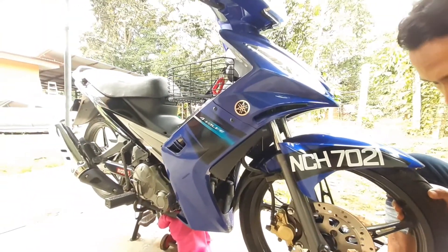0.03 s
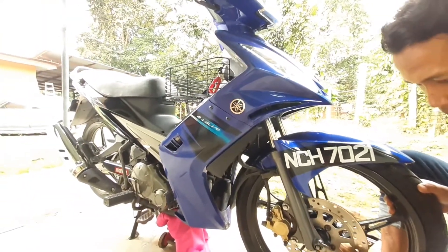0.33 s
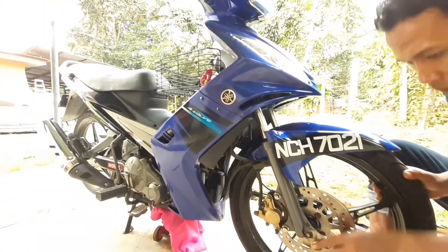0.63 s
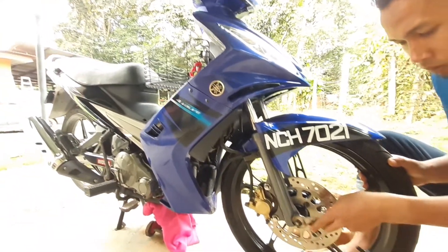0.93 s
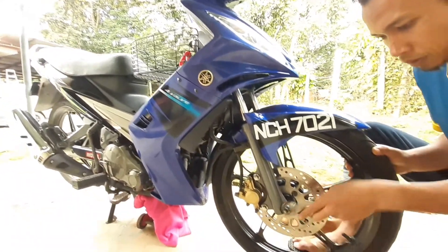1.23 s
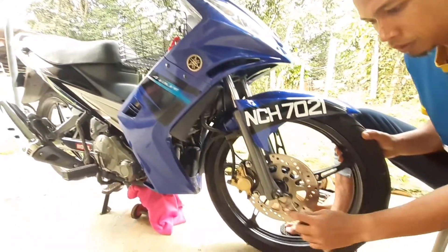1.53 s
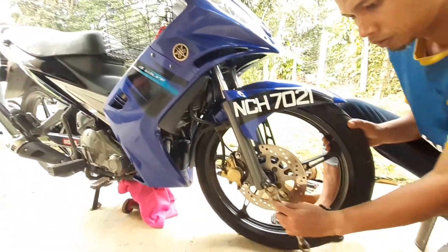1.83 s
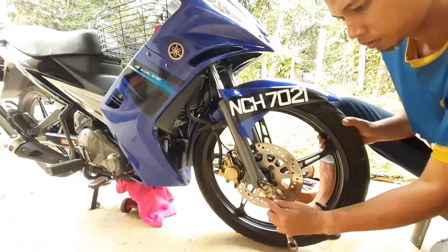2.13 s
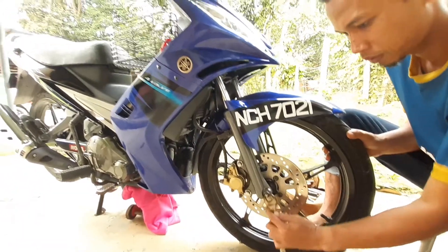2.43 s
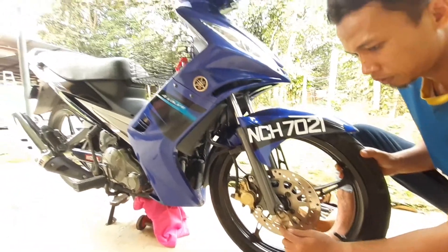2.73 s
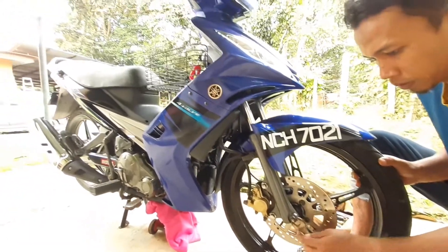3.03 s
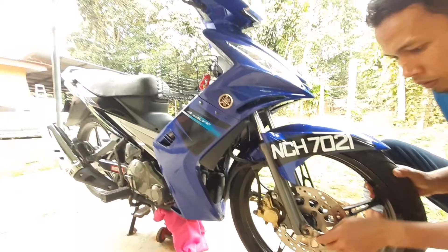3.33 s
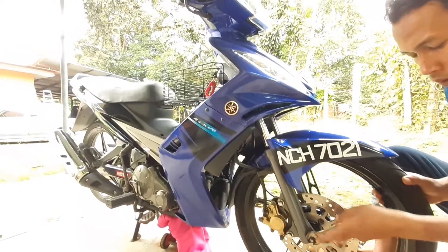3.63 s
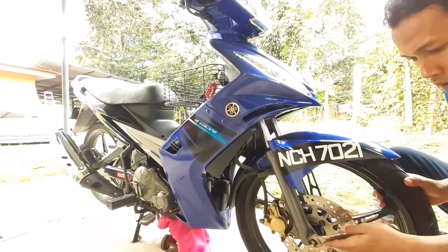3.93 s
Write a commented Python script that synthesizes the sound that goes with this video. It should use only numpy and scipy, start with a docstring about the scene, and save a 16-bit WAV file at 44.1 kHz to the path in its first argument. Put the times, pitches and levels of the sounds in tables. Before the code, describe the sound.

A motorcycle's front wheel gives scattered metallic knocks and brief scrapes as it is worked by hand, close to the microphone under a porch. Farther off, an engine pulls steadily, then eases and burbles with a few pops.

```python
"""A motorcycle's front wheel, worked by hand under a porch, close to a stereo pair of microphones.
Knocks and scuffs set wheel, brake disc and fork ringing; a hand brushes tyre and disc.
Some way off, the firings of a single-cylinder engine thud and rasp through its exhaust:
it pulls steadily, then comes off the throttle and burbles on with a few pops.
A low outdoor rumble and a thin hiss lie underneath."""
import sys
import numpy as np
from scipy import signal
from scipy.fft import rfft, irfft
from scipy.io import wavfile

SR = 44100
rng = np.random.default_rng(int(sys.argv[2]) if len(sys.argv) > 2 else 0)


def transcribe(signal):
    """Save signal, clipped to [-1, 1], as a 16-bit WAV file at the path in sys.argv[1]."""
    frames = np.atleast_2d(signal).T
    limited = np.clip(frames, -1, 1)
    pcm = np.round(limited * 32767).astype(np.int16)
    wavfile.write(sys.argv[1], SR, pcm)


N = 176400
T = np.arange(N) / SR

# Blows between the parts. Each row: start in seconds, gain in dB, brightness in Hz,
# weights of fork, disc and crack in dB, low cut in Hz.
KNOCK_BLOWS = [(.0125, -21, 2940, -12, -8, 3.5, 1350), (.0665, -21.5, 1250, -5.5, 2, -1, 260),
               (0.4792, -16, 1300, 1, 6.5, 5.5, 300), (1.111, -21, 1090, -1, -10, 7.5, 260),
               (1.184, -27, 1720, -1.5, 0, 9, 300), (1.210, -30, 4000, 13, 1.5, 5, 600),
               (1.822, -18.5, 2650, 3, 0, -3, 440), (1.940, -28.5, 1600, -8, 9, -6, 350),
               (1.9715, -19.5, 970, -4.5, -8, -4, 356), (2.359, -44.5, 3570, -12, 4.5, 18, 500),
               (3.164, -12, 4400, 6.5, -3, -3, 292), (3.8665, -16.5, 1460, -1.5, -9, -9, 300)]
# Parts sliding. Each row: start and length in seconds, level in dB, brightness in Hz,
# weight of the disc in dB, grit level in dB.
SCUFF_SLIDES = [(0.34, .07, -44, 1420, 6, -67), (0.455, 0.013, -32, 1900, 2, -67),
                (0.581, .02, -43, 1740, 5, -69), (1.172, 0.069, -48.5, 2040, 10, -52.5),
                (1.882, .02, -32, 1700, 2, -57), (1.922, 0.035, -31.5, 1350, -8, -58),
                (1.987, 0.019, -41, 900, 5, -75), (3.082, 0.04, -41.5, 1400, 5, -56.5),
                (3.118, .044, -36, 1030, 15.5, -53)]
# A hand on tyre and disc. Each row: start and length in seconds, gain in dB, centre in Hz.
HAND_STROKES = [(0.095, 0.17, -62, 4400), (0.997, 0.13, -55.5, 6060)]
# How each part rings. Each row: pitch in Hz, gain in dB, seconds to fall by 60 dB.
FORK_RINGING = [(308.8, -19.5, 0.24), (531.7, -14.5, 0.12)]
WHEEL_RINGING = [(676, -14, 0.15), (729, -1.5, 0.071), (817, -12.5, 0.086), (894, -8, 0.03),
                 (1012, -7.5, 0.15), (1169, -7.5, 0.046), (1290, -18.5, 0.066), (1467, -18, 0.043),
                 (1700, -10, 0.02), (1875, -16.5, 0.041), (2018, -15.5, 0.05), (2256, -17, 0.043),
                 (3790, -22, 0.033), (4000, -14, 0.013)]
DISC_RINGING = [(2733, -10, 0.048), (2780, -10, 0.02), (3180, -16, .03), (6195, -2.5, 0.022)]
# Reflections off slab and bodywork. Each row: delay in seconds, gain in dB.
CLOSE_ECHOES = [(.0043, -7.5), (.0105, -5)]
# Engine speed. Each row: time in seconds, firings per second.
FIRING_RATE = [(0, 31.69), (.165, 32.05), (.46, 32.7), (.76, 33.3), (1.06, 33.9), (1.4, 34.3), (2.5, 35.46),
               (4, 34.45)]
# The engine from a distance. Each row: time in seconds, then exhaust thud, silencer boom and rasp in dB.
ENGINE_LEVELS = [(0, -34, -66, -36), (.15, -33.5, -46, -43), (.7, -33.5, -58.5, -42.5),
                 (.88, -31, -40, -41), (.96, -33.5, -32.5, -42), (1.32, -37.5, -31.5, -42),
                 (1.41, -33.5, -36, -44.5), (1.53, -39.5, -51, -52.5), (1.7, -50, -76, -60),
                 (2.5, -49.5, -53, -91), (3.05, -48, -39, -57.5), (3.55, -60.5, -66, -59.5),
                 (4, -58, -49, -112)]
# Pops off the throttle. Each row: start in seconds, peak in dB.
EXHAUST_POPS = [(1.587, -40), (1.617, -31.5), (1.739, -28), (1.99, -31), (2.122, -29.5), (2.888, -37),
                (3, -33), (3.764, -37)]
# Resonances of the rasp. Each row: centre in Hz, width in Hz, gain in dB.
RASP_BANDS = [(414, 25, 3.5), (706, 109, -3), (860, 51, 6), (1110, 57, -5.5), (1308, 38, -1),
              (2410, 420, -15.5), (3970, 800, -18.5), (8300, 13000, -28)]
# The outdoor background. Each row: frequency in Hz, noise density in dB (power per Hz).
RUMBLE_SPECTRUM = [(20, -100), (50, -76), (100, -73.5), (140, -71), (185, -69.5), (255, -63.5),
                   (305, -72.5), (360, -87.5), (450, -95.5), (530, -86), (730, -88), (950, -108),
                   (1800, -103), (5000, -120)]
HISS_SPECTRUM = [(100, -89.5), (250, -72), (400, -94), (750, -88.5), (1100, -96), (2500, -97), (6000, -101),
                 (7500, -101), (8100, -93), (8900, -103), (10200, -103), (11250, -90.5), (12300, -101),
                 (15200, -108)]

MODE_SCATTER_DB, PHASE_SCATTER_RAD_PER_KHZ = 4, 0.52
WHEEL_PAN_DB, PAN_FALL_DB_PER_KHZ = 2.3, 1.23
CRACK_DB, CRACK_DECAY_S, CRACK_LOW_HZ = -18, 0.014, 900
SLIPS_PER_S, SCUFF_EDGE_S, GRIT_LOW_HZ = 2200, 0.0057, 6000
PORCH_DB, PORCH_T60_S, PORCH_TOP_HZ, PORCH_WIDE_HZ = -8.5, 0.29, 5000, 1120
FIRST_FIRING_S, THROTTLE_OFF_S = .015, 1.49
PULL_SCATTER_DB, BURBLE_SCATTER_DB, BURBLE_JITTER_S = 1.04, 6, 0.00257
EXHAUST_LOW_HZ, EXHAUST_HIGH_HZ, BOOM_WIDTH_HZ = 164.9, 306.6, 2.3
RASP_DECAY_S, RASP_STEADY, RASP_PULSE = 0.024, 0.51, 0.28
WALL_ECHO_S, WALL_ECHO_DB, SIDE_ECHO_S, SIDE_ECHO_DB = 0.01041, -4, .013, -20.5


def wheel(force, bright_hz, fork_db, disc_db, crack_db, low_hz):
    """A contact cracks and rings fork, wheel and disc; each mode meets the microphones out of step."""
    parts = (FORK_RINGING, fork_db), (WHEEL_RINGING, 0), (DISC_RINGING, disc_db)
    modes = [(hz, db + weight, t60) for part, weight in parts for hz, db, t60 in part]
    ringing = 0
    for k, (hz, db, t60) in enumerate(modes):
        khz = hz / 1000
        strength = amp(db + MODE_SCATTER_DB * rng.normal()) * (-1) ** (k // 2)
        balance = pan(WHEEL_PAN_DB - PAN_FALL_DB_PER_KHZ * khz)
        phase = antiphase(PHASE_SCATTER_RAD_PER_KHZ * khz * rng.normal())
        sine = ring(force, hz, t60)
        cosine = np.gradient(sine) * SR / (2 * np.pi * hz)
        ringing += strength * balance * (np.cos(phase) * sine + np.sin(phase) * cosine)
    ringing = butter(ringing, bright_hz, "low", order=3)   # soft contacts are dull
    t = T[:len(force)]
    burst = butter(rng.standard_normal((2, len(t))) * np.exp(-t / CRACK_DECAY_S), CRACK_LOW_HZ, "high")
    crack = amp(CRACK_DB + crack_db) * signal.fftconvolve(burst, force[None], axes=1)[:, :len(t)]
    return butter(ringing, low_hz, "high") + butter(crack, bright_hz, "low", order=1)


def knocks_and_scuffs():
    """Knocks are single blows; scuffs are runs of tiny slips that ring the same parts, with fine grit."""
    out, t = np.zeros((2, N)), T[:SR // 4]
    for start, db, *contact in KNOCK_BLOWS:
        add(out, start, amp(db) * wheel(1.0 * (t == 0), *contact))
    for start, length, db, bright_hz, disc_db, grit_db in SCUFF_SLIDES:
        pressure = np.clip(np.minimum(t, length - t) / SCUFF_EDGE_S, 0, 1)
        slips = (rng.random(len(t)) < SLIPS_PER_S / SR) * rng.standard_normal(len(t)) * pressure
        scuff = wheel(slips, bright_hz, fork_db=-7, disc_db=disc_db, crack_db=5.5, low_hz=300)
        grit = butter(pressure * rng.standard_normal((2, len(t))), GRIT_LOW_HZ, "high", order=1)
        add(out, start, (amp(db) * unit(scuff) + amp(grit_db) * unit(grit)) * np.sqrt(length / t[-1]))
    return out


def hand_rubs():
    """Skin brushes tyre and disc in soft grainy strokes that swell and fade."""
    out = np.zeros((2, N))
    for start, length, db, hz in HAND_STROKES:
        grains = rng.standard_normal((2, N)) * (rng.random(N) < SLIPS_PER_S / SR)
        swell = np.sin(np.pi * np.clip((T - start) / length, 0, 1))
        out += amp(db) * swell * unit(resonate(grains, hz, width_hz=1800))
    return out


def porch(x):
    """The porch adds two close echoes and a short diffuse tail whose lows reach both microphones alike."""
    out, t = x.copy(), T[:SR // 2]
    for delay, db in CLOSE_ECHOES:
        add(out, delay, amp(db) * x)
    mid, side = rng.standard_normal((2, len(t)))
    air = mid + antiphase(butter(side, PORCH_WIDE_HZ, "high"))
    envelope = np.exp(-np.log(1000) * t / PORCH_T60_S) * (1 - np.exp(-t / 0.0017))
    tail = unit(butter(air, PORCH_TOP_HZ, "low") * envelope) * np.sqrt(4 * PORCH_TOP_HZ / SR / len(t))
    return out + amp(PORCH_DB) * signal.fftconvolve(x, tail, axes=1)[:, :N]


def engine():
    """Some way off, the firings thud, boom and rasp; off the throttle the exhaust pops."""
    cycles = np.cumsum(np.interp(T, *np.transpose(FIRING_RATE))) / SR
    pulses = firings(cycles)
    times, *levels = np.transpose(ENGINE_LEVELS)
    thud_gain, boom_gain, rasp_gain = [amp(np.interp(T, times, db)) for db in levels]
    pop_s, pop_db = np.transpose(EXHAUST_POPS)
    pops = silencer(clicks(pop_s, amp(pop_db))) / np.abs(silencer(1.0 * (T == 0))).max()
    echoed = pulses.copy()
    add(echoed, WALL_ECHO_S, amp(WALL_ECHO_DB) * pulses)   # a wall repeats each firing
    thuds = unit(silencer(echoed))
    low = thud_gain * thuds + boom_gain * boom(thuds, cycles, harmonic=7) + pops
    out = (low + rasp_gain * rasp(pulses)) * pan(db=0.47)
    add(out, SIDE_ECHO_S, amp(SIDE_ECHO_DB) * antiphase(low))
    return out


def firings(cycles):
    """One pulse per engine cycle; off the throttle they turn uneven in time and strength."""
    times = FIRST_FIRING_S + np.interp(np.arange(int(cycles[-1])), cycles, T)
    coasting = times > THROTTLE_OFF_S
    jitter, scatter = rng.standard_normal((2, len(times)))
    sizes = amp(np.where(coasting, BURBLE_SCATTER_DB, PULL_SCATTER_DB) * scatter)
    return clicks(times + coasting * BURBLE_JITTER_S * jitter, sizes)


def silencer(x):
    """The silencer passes one low band with steep sides."""
    return butter(x, [EXHAUST_LOW_HZ, EXHAUST_HIGH_HZ], "band", order=4)


def boom(thuds, cycles, harmonic):
    """The silencer's boom: one multiple of the firing rate, picked out of the thuds as a clean tone."""
    carrier = np.exp(2j * np.pi * harmonic * cycles)
    envelope = butter(thuds / carrier, BOOM_WIDTH_HZ, "low")
    envelope = butter(envelope[::-1], BOOM_WIDTH_HZ, "low")[::-1]   # backwards, to cancel the delay
    return unit((envelope * carrier).real)


def rasp(pulses):
    """Gas noise surges with each firing and sounds through a set of resonances."""
    surge = unit(signal.lfilter([1], [1, -np.exp(-1 / (RASP_DECAY_S * SR))], pulses))
    gas = unit((RASP_STEADY + surge) * rng.standard_normal((2, N))) + RASP_PULSE * unit(pulses)
    bands = [(-1) ** k * amp(db) * resonate(gas, hz, width) for k, (hz, width, db) in enumerate(RASP_BANDS)]
    return unit(sum(bands))


def outdoors():
    """A low rumble common to both microphones and a thin hiss that differs in each."""
    return noise(RUMBLE_SPECTRUM, channels=1) * pan(db=0.4) + noise(HISS_SPECTRUM, channels=2)


def noise(spectrum, channels):
    """Steady noise of the given colour, unrelated between channels."""
    hz, db = np.transpose(spectrum)
    bins_hz = np.fft.rfftfreq(N, 1 / SR) + 1e-3
    colour = amp(np.interp(np.log(bins_hz), np.log(hz), db))
    return irfft(rfft(rng.standard_normal((channels, N))) * colour, N) * np.sqrt(SR / 2)


def amp(db):
    """Decibels to gain."""
    return 10 ** (np.asarray(db) / 20)


def unit(x):
    """Scale to rms 1."""
    return x / np.sqrt(np.mean(x ** 2) + 1e-20)


def pan(db):
    """Stereo gains; positive dB leans left."""
    return amp([[db], [-db]])


def antiphase(x):
    """Upright on the left, inverted on the right."""
    return x * np.array([[1], [-1]])


def butter(x, hz, kind, order=2):
    """Causal Butterworth filter."""
    return signal.sosfilt(signal.butter(order, hz, kind, fs=SR, output="sos"), x + 1e-18)


def resonate(x, hz, width_hz):
    """Resonance with gain 1 at its peak."""
    r, w = np.exp(-np.pi * width_hz / SR), 2 * np.pi * hz / SR
    return signal.lfilter(np.array([1, 0, -1]) * (1 - r * r) / 2, [1, -2 * r * np.cos(w), r * r], x + 1e-18)


def ring(x, hz, t60):
    """A unit click sets a sine of height 1 ringing."""
    r, w = np.exp(-np.log(1000) / (t60 * SR)), 2 * np.pi * hz / SR
    return signal.lfilter([0, np.sin(w)], [1, -2 * r * np.cos(w), r * r], x + 1e-18)


def add(out, start_s, x):
    """Mix x into out from start_s."""
    i = max(int(start_s * SR), 0)
    out[..., i:i + x.shape[-1]] += x[..., :max(N - i, 0)]


def clicks(times, sizes):
    """A train of single-sample clicks."""
    return np.bincount(np.clip(times * SR, 0, N).astype(int), sizes, N + 1)[:N]


def scene():
    """The wheel close by under the porch, the engine further off, open air behind."""
    return porch(knocks_and_scuffs() + hand_rubs()) + engine() + outdoors()


def record(dry):
    """The microphones drop the deepest bass; the top is cut steeply at 15.5 kHz."""
    x = butter(dry, hz=35.6, kind="high", order=4)
    return signal.sosfilt(signal.ellip(12, .1, 80, 15500, fs=SR, output="sos"), x)


dry = scene()
out = record(dry)
transcribe(out)
```